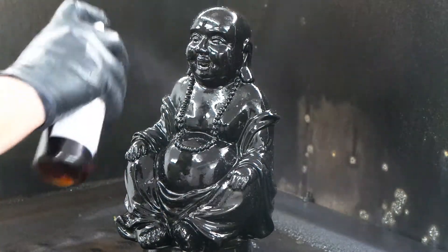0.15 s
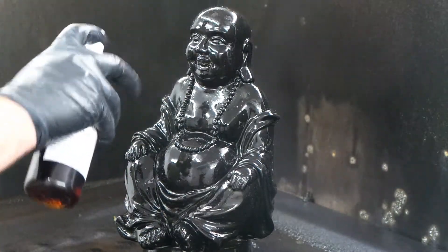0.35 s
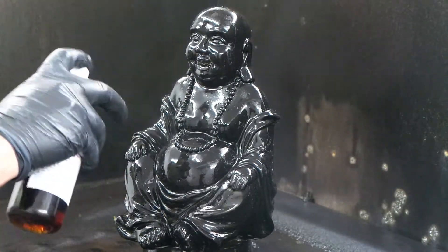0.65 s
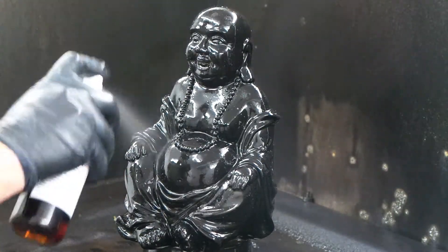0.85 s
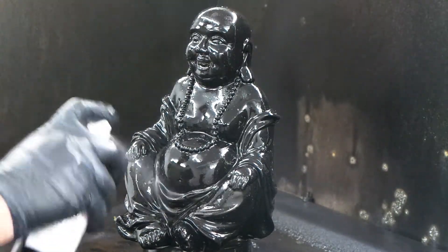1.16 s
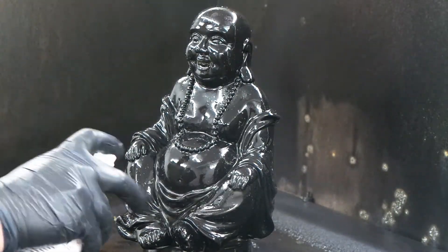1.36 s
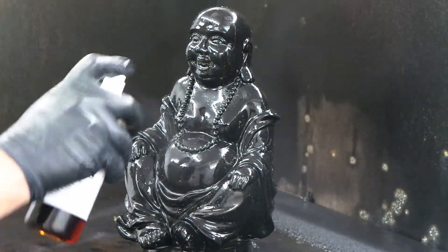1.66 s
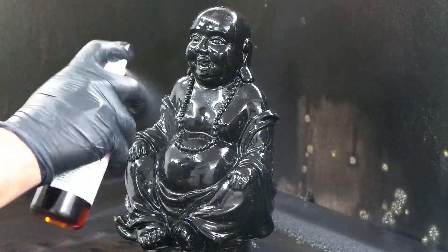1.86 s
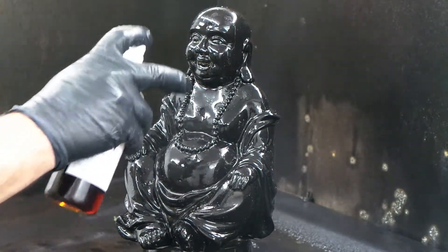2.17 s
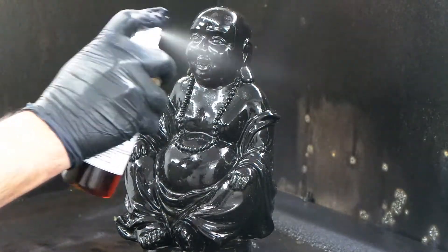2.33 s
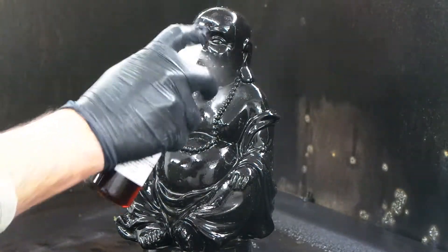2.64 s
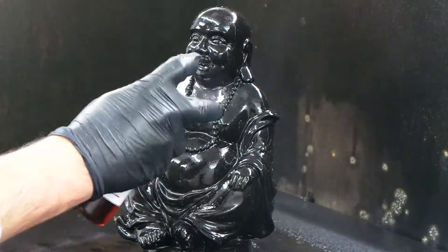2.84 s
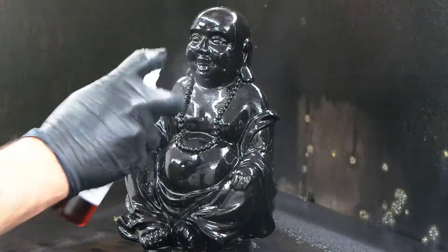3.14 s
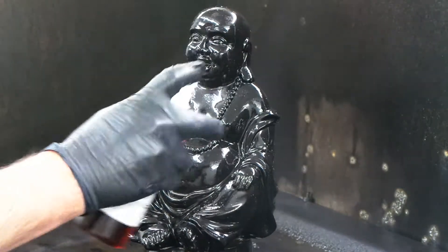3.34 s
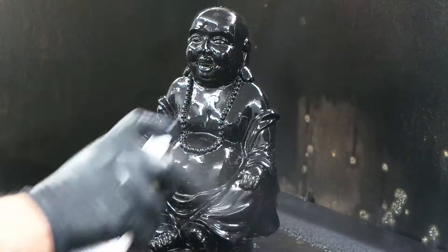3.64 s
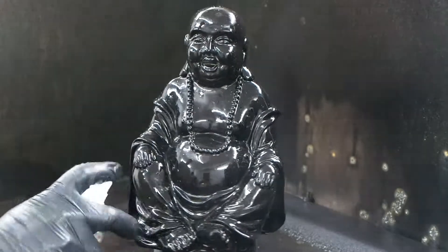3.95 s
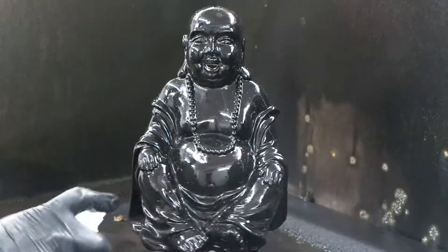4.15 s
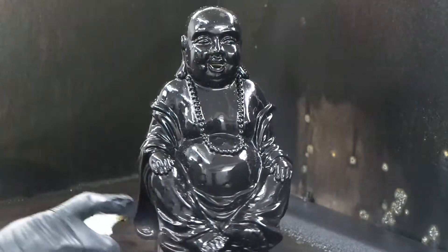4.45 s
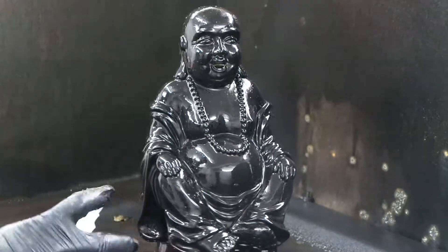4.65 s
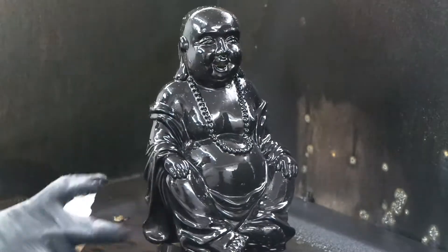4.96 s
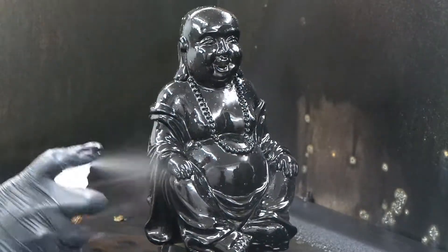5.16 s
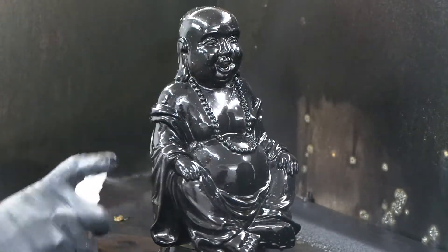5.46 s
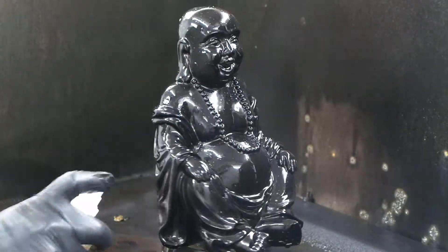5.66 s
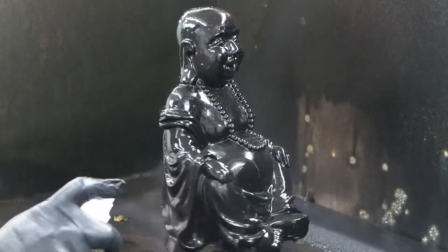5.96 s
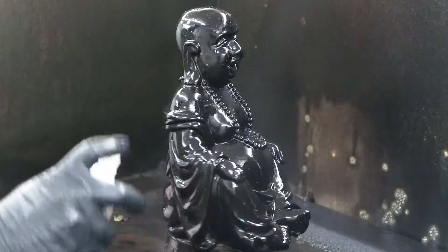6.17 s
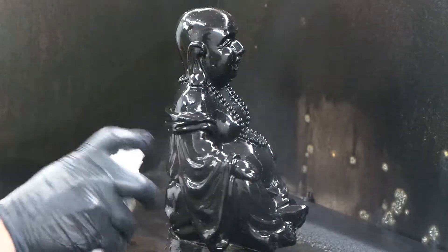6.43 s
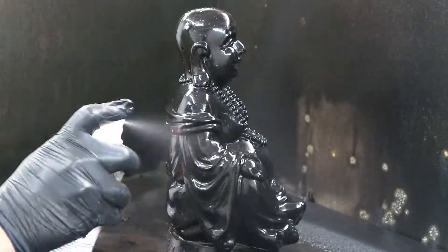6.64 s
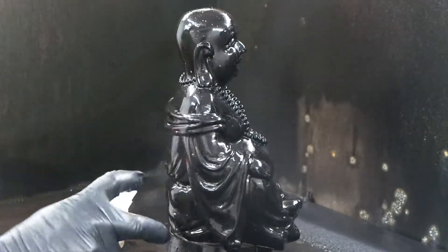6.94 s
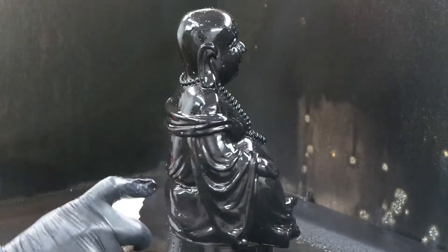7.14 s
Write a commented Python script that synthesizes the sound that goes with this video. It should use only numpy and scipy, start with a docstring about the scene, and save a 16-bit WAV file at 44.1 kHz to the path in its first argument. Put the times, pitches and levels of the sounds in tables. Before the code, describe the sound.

In a small, close-walled booth with a faint low mains hum and soft air, a hand spray bottle squirts at a steady pace, roughly every 0.4 seconds, from 0.1 to 3.1 seconds. Each squirt lasts about a tenth of a second: a low hollow thud and small chirp of the pump under a bright, grainy hiss that builds and drops away into a short reverberant tail. The first is quickest and most abrupt. A slight fizzy suck follows at 0.76. After a short gap, a longer squirt at 3.64 coincides with a knock, and ten squirts continue to 7.1, with more thud and less chirp. Beneath them a stand turns with faint uneven rubbing and dull bumps, notably near 4.7, 5.75 and 6.3. Faint sucks occur around 3.9, 4.8 and 5.8. Hum and air swell with the squirts and sink between them; friction rises again at the end.

```python
"""In a small humming booth, a hand spray bottle squirts nineteen times at a glossy figure, with one short pause.
Each stroke is a low resonant thud and valve chirp plus a jet of turbulent noise: the quicker, the harder it starts.
Four faint fizzy sucks draw liquid back. After the pause the figure is turned on its stand: friction noise and
bumps excite the stand's resonances. Decaying noise forms the booth's reflections; hum is sines, air is noise.
The microphone feeds an expander, so hum and air swell with every squirt and sink in the gaps."""
import sys
import numpy as np
from scipy import signal
from scipy.fft import rfft, irfft, next_fast_len
from scipy.io import wavfile
from scipy.ndimage import uniform_filter1d

SR = 44100
rng = np.random.default_rng(int(sys.argv[2]) if len(sys.argv) > 2 else 0)


def materialize(psi):
    """Save the field psi as 16-bit PCM at rate SR to the path in sys.argv[1].

    A 1-D psi becomes a single channel; in a 2-D psi each row is a channel.
    """
    bounded = np.clip(np.atleast_2d(psi).T, -1, 1)
    quanta = np.round(bounded * 32767).astype(np.int16)
    wavfile.write(sys.argv[1], SR, quanta)


N = 321930
TIME = np.arange(N) / SR
AGE = np.arange(SR // 2) / SR   # seconds since the start of one short event
PAUSE_END_S = 3.63

# pump strokes: start_s, stroke_s, relative level_db, lower_hollow_hz (lower notch in the sound)
STROKES = [(0.116, 0.072, -44, 1070), (0.472, 0.12, -45, 734), (0.854, 0.1, -44.5, 740),
           (1.225, 0.095, -44.5, 1050), (1.609, 0.095, -45, 900), (1.974, 0.1, -43.5, 836),
           (2.37, 0.09, -44.5, 790), (2.72, 0.11, -46.5, 1150), (3.082, 0.094, -46, 796),
           (3.638, 0.15, -45.5, 1180), (4.082, 0.12, -44, 690), (4.452, 0.085, -44.5, 730),
           (4.858, 0.11, -44.5, 825), (5.196, 0.086, -44.5, 900), (5.558, 0.1, -45, 680),
           (5.943, 0.11, -43.5, 770), (6.346, 0.11, -43.5, 836), (6.729, 0.093, -44.5, 1070),
           (7.132, 0.09, -43, 695)]


def squirts(jet_db=2.0, booth_db=-6):
    """Superposition: jet and pump sound together in each stroke, with their reflections in the booth."""
    out = np.zeros(N)
    for start_s, stroke_s, level_db, _ in STROKES:
        direct = from_db(jet_db) * jet(stroke_s) + pump(stroke_s, late=start_s > PAUSE_END_S)
        with_booth = direct + from_db(booth_db) * booth(direct)
        add(out, start_s, from_db(level_db) * with_booth)
    return out


def jet(stroke_s, build_s=0.059, flutter_db=0.1, tilt_db_per_octave=0.02):
    """Turbulence: growing pressure tears liquid into mist; a quick stroke opens more abruptly."""
    # relative spectrum before the treble tilt: frequency_hz, density_db (per Hz)
    jet_spectrum = [(100, -10), (260, -9), (430, -3), (600, -4.5), (770, -7), (1000, -2), (1200, -6),
                    (1500, -0.5), (1900, -2), (2400, -2.5), (4000, 0), (6300, 2.5), (10000, 2), (14500, 0)]
    # start level re full jet: -10.5 dB at the usual stroke, 9 dB more per doubling of speed
    opening_db = -10.5 + 9 * quickness(stroke_s)
    slack = np.clip(1 - AGE / (build_s + 0.2 * stroke_s), 0, 1)
    pressure = from_db(opening_db * slack ** 2.0)
    flow = pressure * swell(0, stroke_s, rise_s=0.0032, fall_s=0.035)
    sputter = rms_one(uniform_filter1d(rng.standard_normal(len(AGE)), size=200))
    # tilt about 7500 Hz, constant below 4000 Hz
    tilted = [(hz, db + tilt_db_per_octave * np.log2(max(hz, 4000) / 7500)) for hz, db in jet_spectrum]
    mist = coloured(grains(per_s=12000, smooth=1.14), tilted)
    return flow * from_db(flutter_db * sputter) * mist


def pump(stroke_s, late):
    """Forced resonance: the piston thuds in the bottle, liquid chirps in the valve; quick strokes louder."""
    # relative thud spectrum: frequency_hz, density_db (per Hz)
    thud_spectrum = [(90, -10), (250, -13.5), (350, 4.5), (430, 2.5), (560, 1), (720, -5), (900, -4.5),
                     (1200, -5), (2500, -25), (6000, -66)]
    # valve resonances: frequency_hz, width_hz (of the first of two filters), relative level_db
    valve_modes = [(1451, 70, -3), (1573, 87, -4)]
    # dB at the usual stroke, dB per doubling of speed; after the pause more thud, less chirp
    thud_db = -12.5 + 8 * quickness(stroke_s) + 2.5 * late
    chirp_db = -11.5 + 4.5 * quickness(stroke_s) - 6 * late
    thud_push = from_db(thud_db) * swell(delay_s=0.015, length_s=0.025, rise_s=0.017, fall_s=0.028)
    chirp_push = from_db(chirp_db) * swell(delay_s=0.018, length_s=0.026, rise_s=0.015, fall_s=0.012)
    valve = np.zeros(len(AGE))
    for hz, width_hz, level_db in valve_modes:
        once = resonate(rng.standard_normal(len(AGE)), hz, width_hz)
        valve += from_db(level_db) * resonate(once, hz, 2 * width_hz)
    thud = thud_push * coloured(grains(per_s=3000, smooth=0.64), thud_spectrum)
    return thud + chirp_push * rms_one(valve)


def quickness(stroke_s, usual_stroke_s=0.1):
    """Speed is inverse to duration: doublings of piston speed over the usual stroke."""
    return np.log2(usual_stroke_s / stroke_s)


def hollowed(x, fade_s=0.02):
    """Band rejection: through each squirt's body two narrow bands of the whole sound hollow out, then refill."""
    out = x.copy()
    for start_s, stroke_s, _, low_hz in STROKES:
        part = x[int(start_s * SR):][:len(AGE)]
        age = AGE[:len(part)]
        # the upper hollow varies from squirt to squirt
        high_hz = 1840 * (1 + 0.048 * rng.standard_normal())
        since_start = age - 0.04
        until_end = stroke_s + 0.03 + fade_s - age
        depth = np.clip(np.minimum(since_start, until_end) / fade_s, 0, 1)
        hollow = notch(notch(part, low_hz, width_hz=190), high_hz, width_hz=130)
        add(out, start_s, depth * (hollow - part))
    return out


def refills(suck_db=1.5, half_s=0.0205):
    """Suction turbulence: the spring lifts the piston with a faint fizzy suck."""
    # liquid drawn back: start_s, level_db (before the common gain suck_db)
    suck_events = [(0.764, -62), (3.929, -66), (4.762, -64.5), (5.826, -58.5)]
    # relative spectrum: frequency_hz, density_db (per Hz)
    suck_spectrum = [(300, 1), (1000, -9), (2400, -3), (4200, -6), (7000, -9), (14000, -20)]
    out = np.zeros(N)
    for start_s, level_db in suck_events:
        flow = from_db(level_db + suck_db) * swell(0, half_s, rise_s=0.0034, fall_s=half_s)
        add(out, start_s, flow * coloured(grains(per_s=1500, smooth=1.0), suck_spectrum))
    return out


def stand(bump_db=3.5, uneven_db=3.0):
    """Modal excitation: uneven rolling friction and soft bumps ring the same resonances of the stand."""
    # rolling friction: time_s, level_db (mean course, before the unevenness)
    rolling_course = [(3.65, -70), (4.1, -65), (4.45, -72), (4.8, -70), (5.2, -72.5), (6.1, -69.5),
                      (6.72, -63.5), (7.0, -71), (7.3, -60.5)]
    # knocks: start_s, length_s (half holds, half is the decay time), level_db (before bump_db), cutoff_hz
    knocks = [(3.632, 0.017, -54, 3000), (4.276, 0.028, -61.5, 1190), (4.66, 0.016, -56.5, 1200),
              (5.714, 0.045, -61.5, 1200), (5.784, 0.043, -61, 3000), (6.193, 0.069, -59.5, 1390),
              (6.274, 0.038, -52, 800), (6.303, 0.027, -51.5, 700), (6.602, 0.046, -69.5, 2500)]
    # resonances: frequency_hz, width_hz, relative level_db
    stand_modes = [(117, 24, 3.5), (165, 17.5, 1.5), (248, 49, -5), (326.5, 14, 2), (443, 53, -0.5),
                   (579, 52, 0), (638, 28, -4.5), (839, 51, 0.5), (914, 60, -1.5), (1208, 64, -1),
                   (1630, 1100, -14), (2326, 130, -5.5), (3870, 3800, -16)]
    rolling_db = np.interp(TIME, *np.transpose(rolling_course)) + uneven_db * drift(per_s=3.9)
    force = grains(per_s=2700, smooth=0.27, size=N) * from_db(rolling_db)
    force *= np.clip((TIME - PAUSE_END_S) / 0.026, 0, 1)   # turning starts as the pause ends
    for start_s, length_s, level_db, cutoff_hz in knocks:
        push = from_db(level_db + bump_db) * swell(0, length_s / 2, rise_s=0.0018, fall_s=length_s / 2)
        push = push * grains(per_s=2900, smooth=0.43)
        softening = signal.butter(1, cutoff_hz, fs=SR, output="sos")
        add(force, start_s, signal.sosfilt(softening, push))
    # the resonances together pass on the power of a white force
    power = sum(from_db(2 * db) * np.pi * width_hz / SR for _, width_hz, db in stand_modes)
    ringing = np.zeros(N)
    for k, (hz, width_hz, db) in enumerate(stand_modes):
        ringing += (-1) ** k * from_db(db) * resonate(force + 1e-18, hz, width_hz)
    return ringing / np.sqrt(power)


def booth(x, t60_s=0.39):
    """Reverberation: dense reflections between close walls decay exponentially; each call has its own pattern."""
    reflections = rng.standard_normal(len(AGE)) * from_db(-60 * AGE / t60_s)
    reflections *= AGE > .002   # the first reflection needs 2 ms
    return signal.fftconvolve(x, reflections / np.linalg.norm(reflections))[:len(x)]


def background(air_db=-63):
    """Periodic and random sources: slightly wavering mains hum over softly moving air."""
    # hum partials: frequency_hz, level_db (rms, before the waver and the expander)
    hum_partials = [(100, -59.5), (200, -78.5), (400, -82.5)]
    # relative air spectrum: frequency_hz, density_db (per Hz)
    air_spectrum = [(15, -65), (25, -23), (49, -20.5), (74, -10), (117, -14), (149, -14.5), (253, -16),
                    (679, -22.5), (1220, -27), (1870, -27.5), (4040, -29.5), (4380, -28), (4740, -30),
                    (14500, -29.5)]
    hum = np.zeros(N)
    for hz, level_db in hum_partials:
        hum += np.sqrt(2) * from_db(level_db) * np.sin(2 * np.pi * (hz * TIME + rng.random()))
    waver = from_db(.8 * drift(per_s=8))
    air = from_db(air_db) * coloured(rng.standard_normal(N), air_spectrum)
    return hum * waver + air


def from_db(db):
    """Logarithmic level: decibels to amplitude gain."""
    return 10 ** (np.asarray(db) / 20)


def rms_one(x):
    """Normalisation of power: scale to unit rms."""
    return x / np.sqrt(np.mean(x ** 2) + 1e-20)


def drift(per_s):
    """Low-passed noise: a smooth random course of spread 1, with both filter poles at per_s Hz."""
    r = np.exp(-80 * np.pi * per_s / SR)   # at one value per 40 samples
    slow = signal.lfilter([1], [1, -2 * r, r * r], rng.standard_normal(N // 40 + 2002))
    slow = slow[2000:]   # drop the filter's settling
    return np.interp(np.arange(N) / 40, np.arange(len(slow)), rms_one(slow))


def coloured(x, spectrum):
    """Spectral shaping: weight a white excitation in frequency, then scale to rms 1."""
    hz, db = np.transpose(spectrum)
    size = next_fast_len(len(x))
    bins = np.maximum(np.fft.rfftfreq(size, 1 / SR), 1)
    gain = from_db(np.interp(np.log(bins), np.log(hz), db))
    return rms_one(irfft(rfft(x, size) * gain, size)[:len(x)])


def grains(per_s, smooth, size=len(AGE)):
    """Shot noise: random tiny impacts over a share of smooth turbulence, at rms 1."""
    impacts = (rng.random(size) < per_s / SR) * rng.standard_normal(size)
    return rms_one(rms_one(impacts) + smooth * rng.standard_normal(size))


def resonate(x, hz, width_hz):
    """Damped oscillator: a two-pole resonance with gain 1 at its peak."""
    r = np.exp(-np.pi * width_hz / SR)
    feedback = [1, -2 * r * np.cos(2 * np.pi * hz / SR), r * r]
    return signal.lfilter(np.array([1, 0, -1]) * (1 - r * r) / 2, feedback, x)


def notch(x, hz, width_hz):
    """Cancellation: subtract a resonant band twice over, leaving a deep hollow."""
    once = x - resonate(x, hz, width_hz)
    return once - resonate(once, hz, width_hz)


def swell(delay_s, length_s, rise_s, fall_s):
    """Build-up and relaxation: a push rises linearly, holds until its length is over and decays exponentially."""
    age = AGE - delay_s
    return np.clip(age / rise_s, 0, 1) * np.exp(-np.maximum(age - length_s, 0) / fall_s)


def add(track, start_s, sound):
    """Linear superposition: lay a short sound into a track."""
    at = int(start_s * SR)
    track[at:at + len(sound)] += sound[:N - at]


def scene(handling_room_db=-3.5):
    """Superposition of bottle, stand, booth and background, the same in both channels."""
    handling = refills() + stand()
    handling_room = from_db(handling_room_db) * booth(handling)
    whole = squirts() + handling + handling_room + background()
    return np.tile(hollowed(whole), (2, 1))


def expander(x, closed_db=-68.0, open_db=-52.0, band_closed_db=-92.0, band_span_db=5.5,
             depth_db=11.5, sense_hz=250, settle_s=0.0082, size=512):
    """Downward expansion: a band opens only if the sound above sense_hz is loud and the band itself is strong."""
    hop = size // 4
    hz, _, bands = signal.stft(x[0], SR, nperseg=size, noverlap=size - hop)
    power = abs(bands) ** 2 + 1e-16
    level_db = 10 * np.log10(power[hz > sense_hz].sum(axis=0))
    across_bands = uniform_filter1d(power, size=2, axis=0)
    band_db = 10 * np.log10(uniform_filter1d(across_bands, size=9, axis=1))
    loud = np.clip((level_db - closed_db) / (open_db - closed_db), 0, 1)
    stands_out = np.clip((band_db - band_closed_db) / band_span_db, 0, 1)
    r = np.exp(-hop / (settle_s * SR))
    opening = signal.lfilter([1 - r], [1, -r], loud * stands_out)
    gain = from_db(depth_db * (opening - 1))
    out = signal.istft(bands * gain, SR, nperseg=size, noverlap=size - hop)[1]
    return np.tile(out[:N], (2, 1))


def record(dry):
    """Dynamic expansion, then band limiting by a steep elliptic low-pass."""
    low_pass = signal.ellip(12, .1, 70, 14620, fs=SR, output="sos")   # ripple dB, stopband dB, cutoff Hz
    return signal.sosfilt(low_pass, expander(dry))


dry = scene()
out = record(dry)
materialize(out)
```